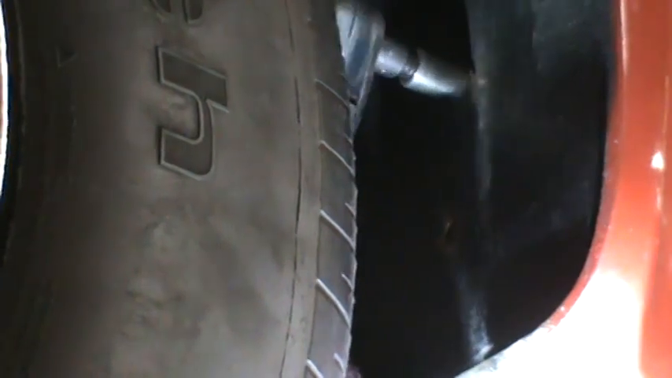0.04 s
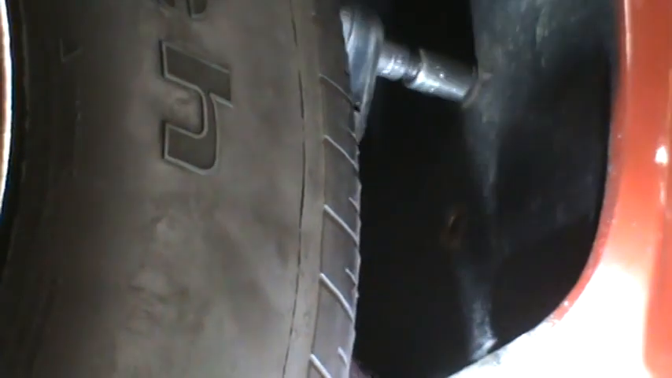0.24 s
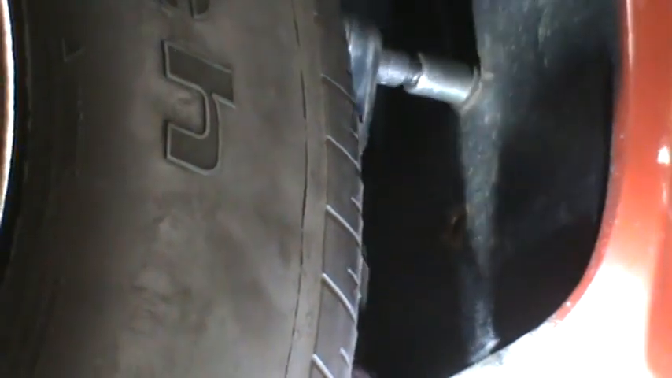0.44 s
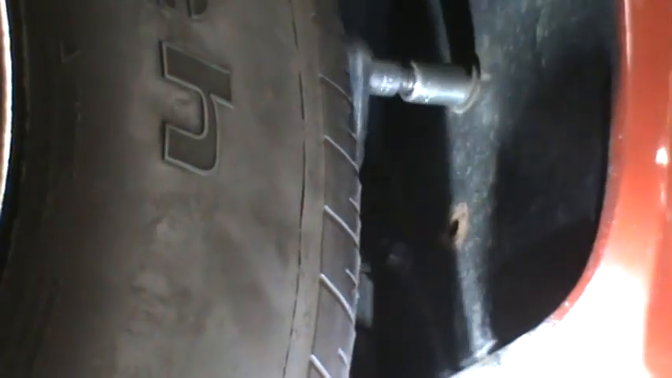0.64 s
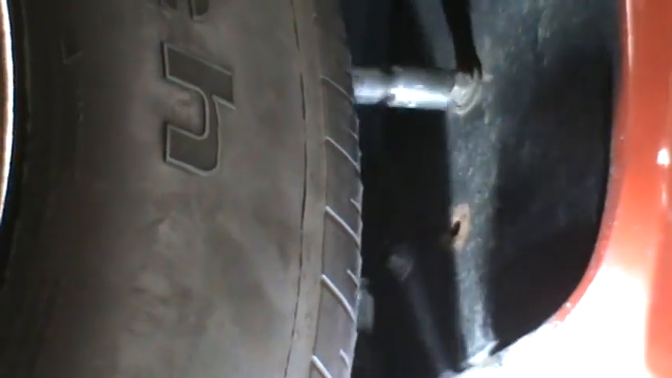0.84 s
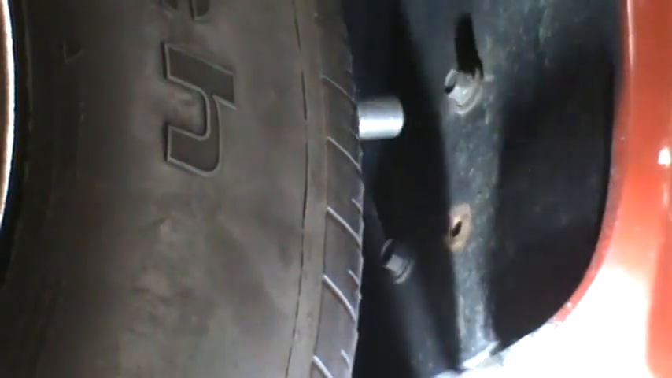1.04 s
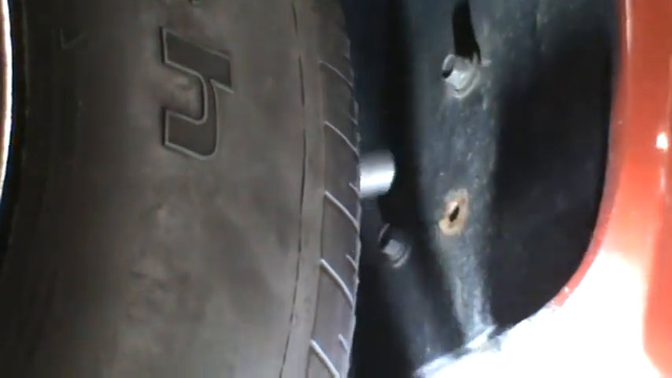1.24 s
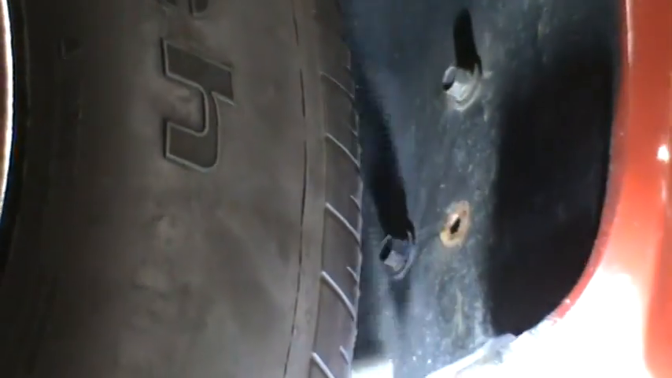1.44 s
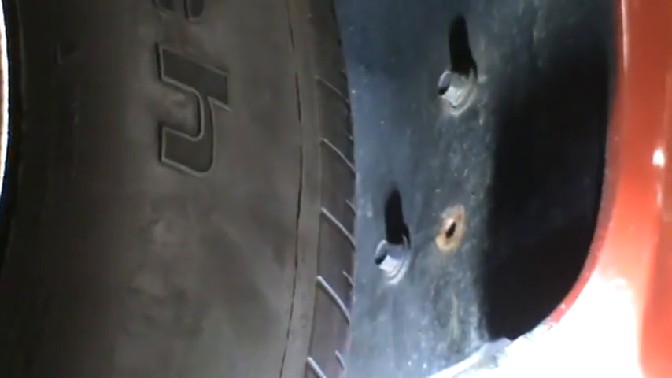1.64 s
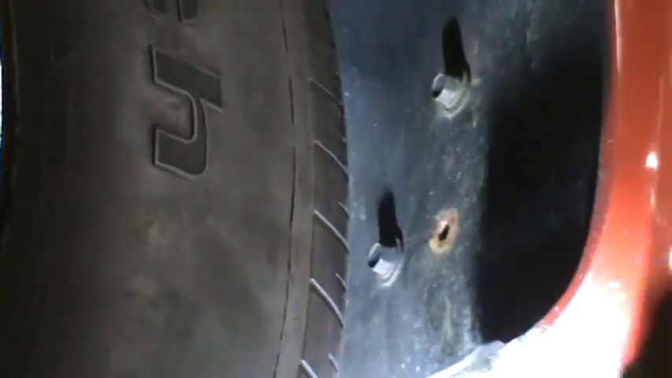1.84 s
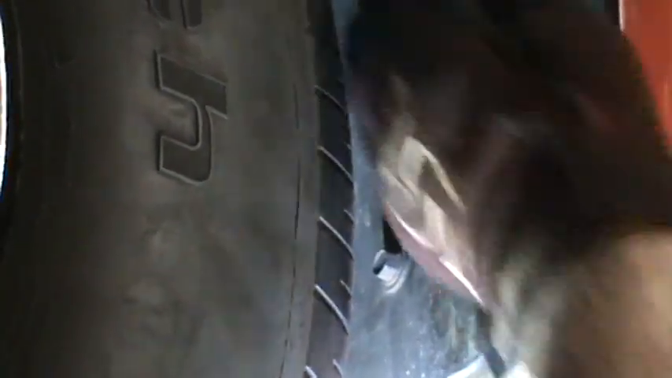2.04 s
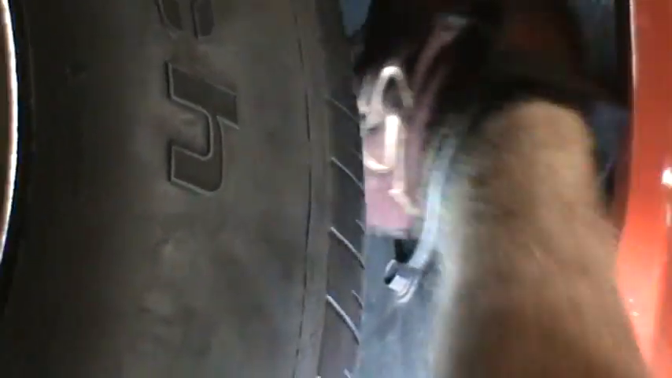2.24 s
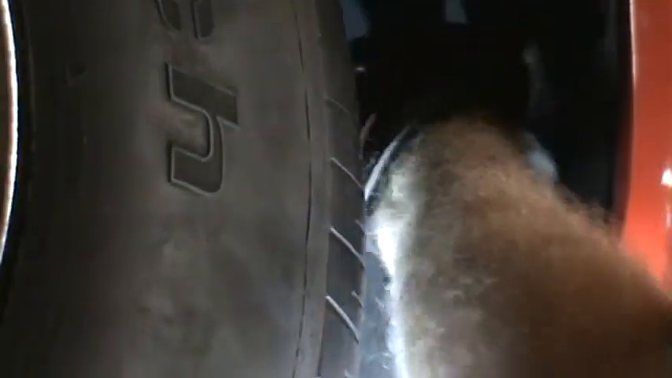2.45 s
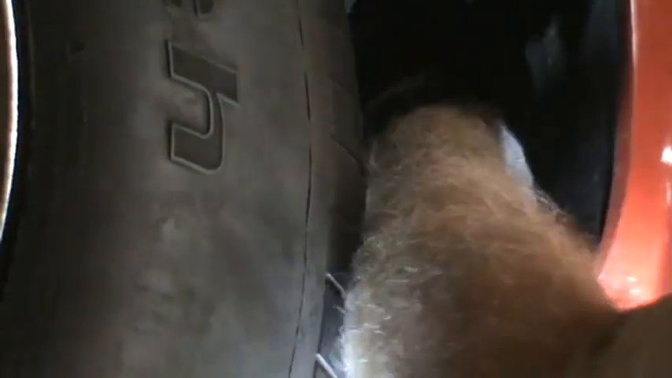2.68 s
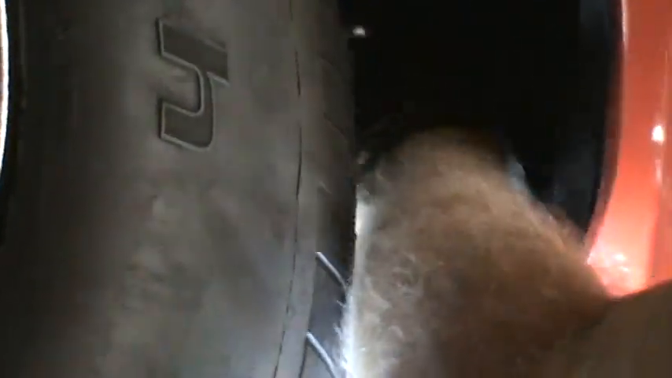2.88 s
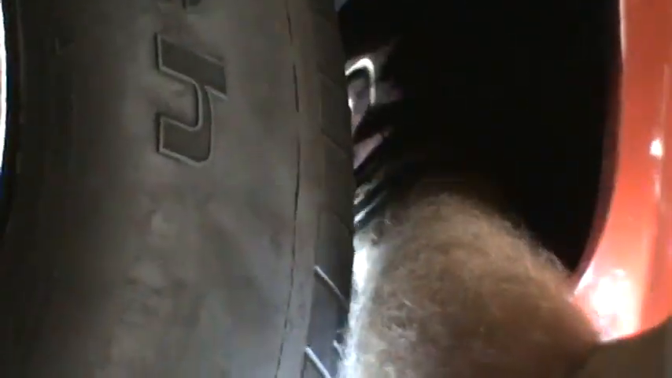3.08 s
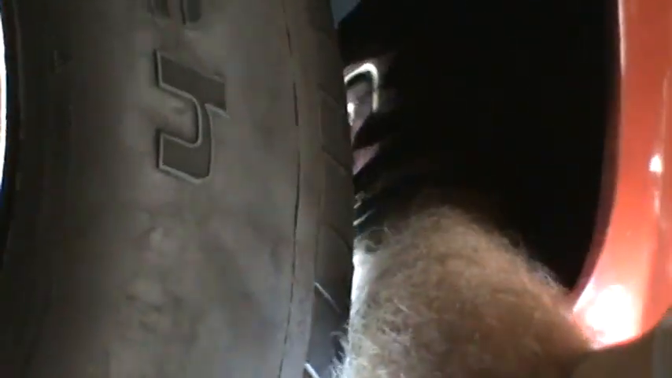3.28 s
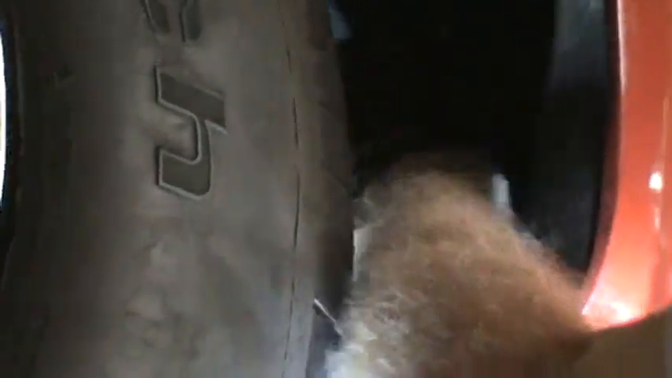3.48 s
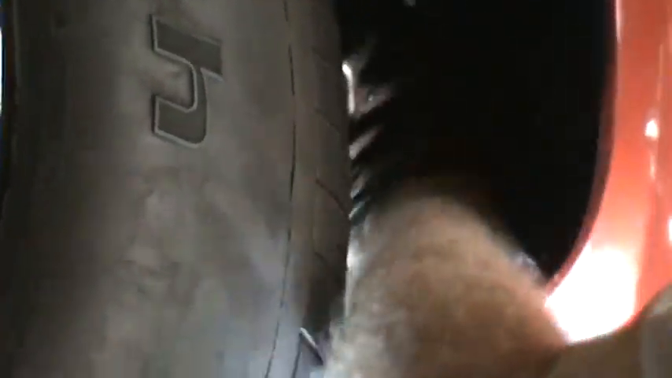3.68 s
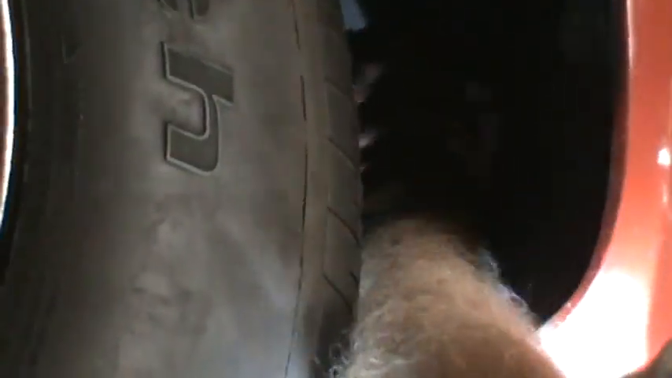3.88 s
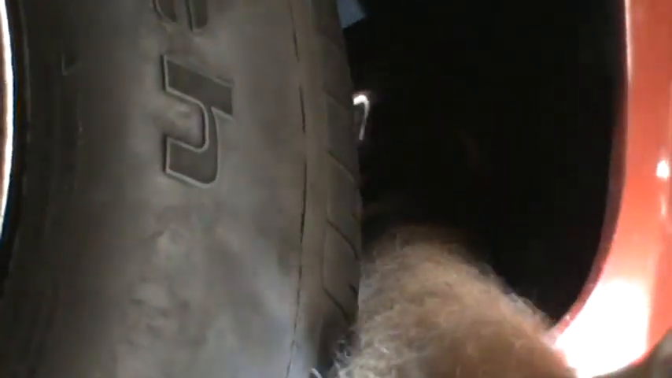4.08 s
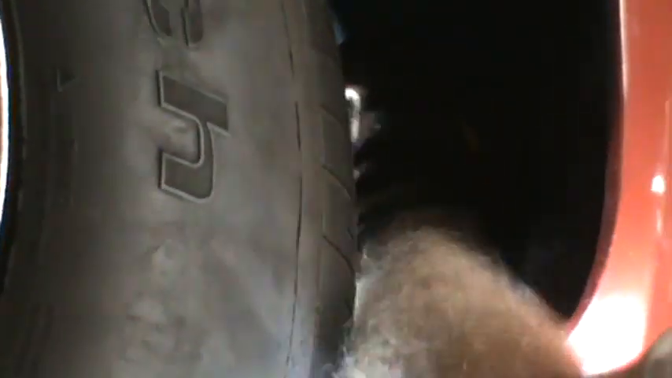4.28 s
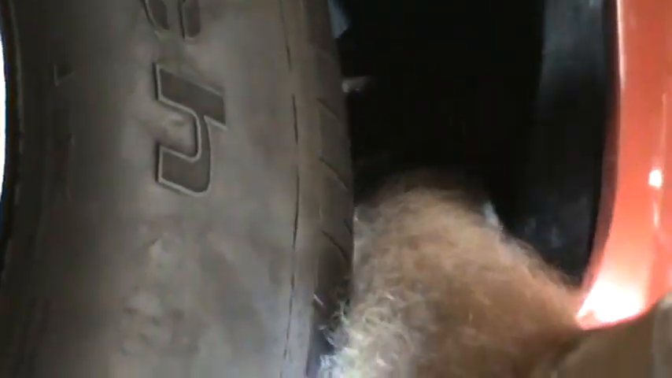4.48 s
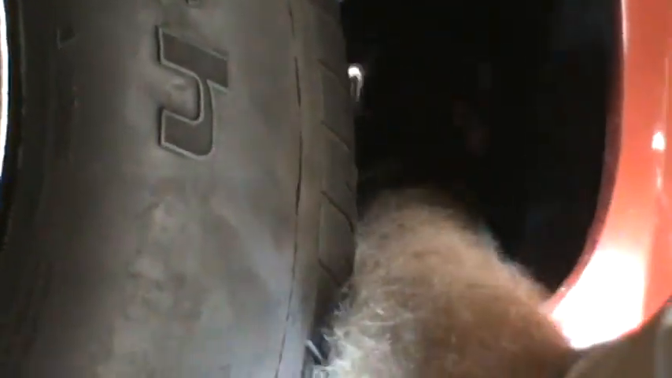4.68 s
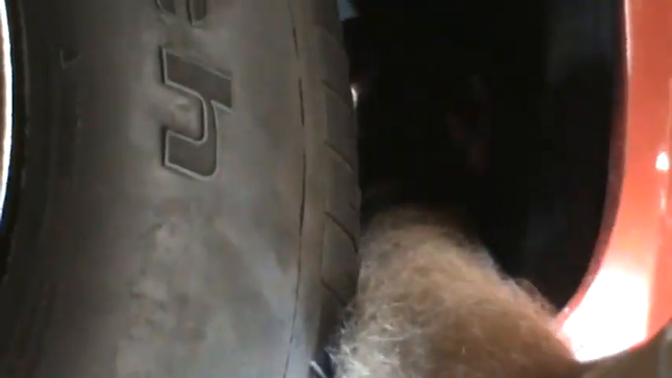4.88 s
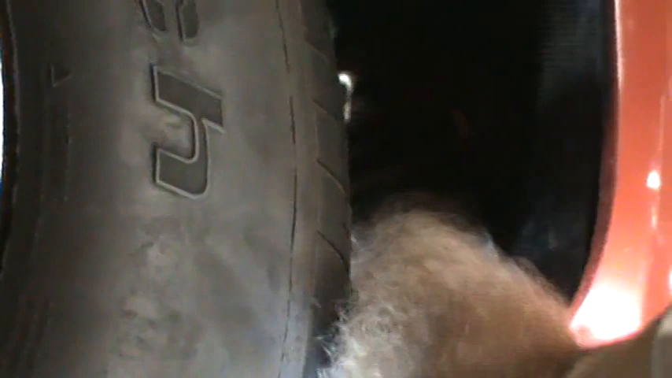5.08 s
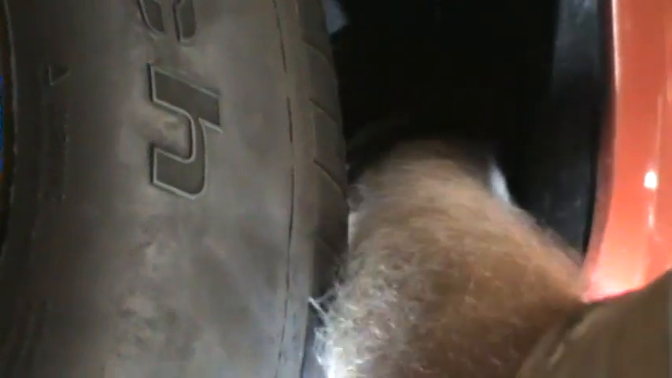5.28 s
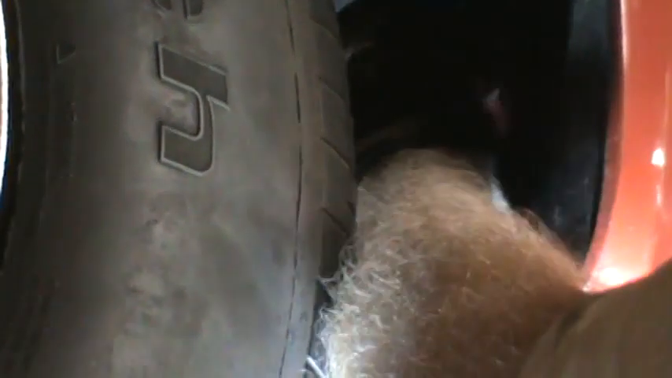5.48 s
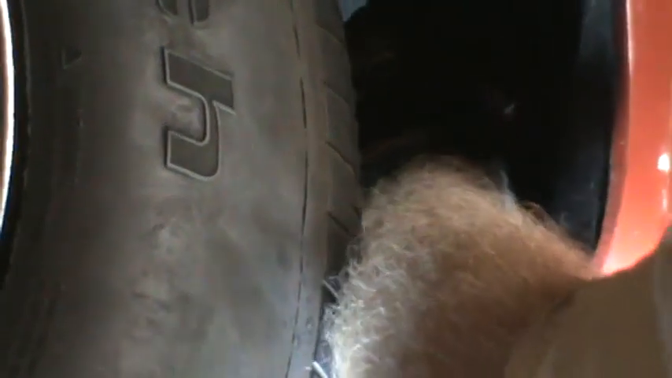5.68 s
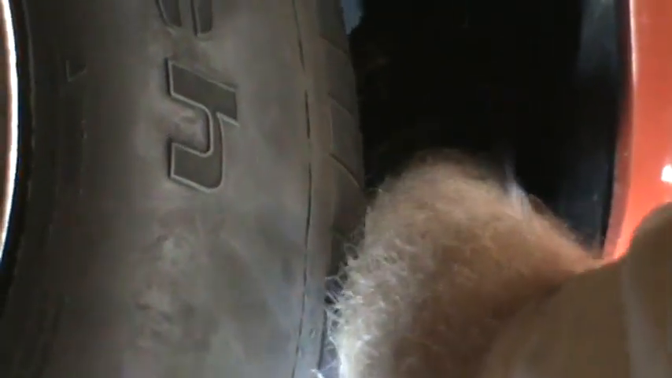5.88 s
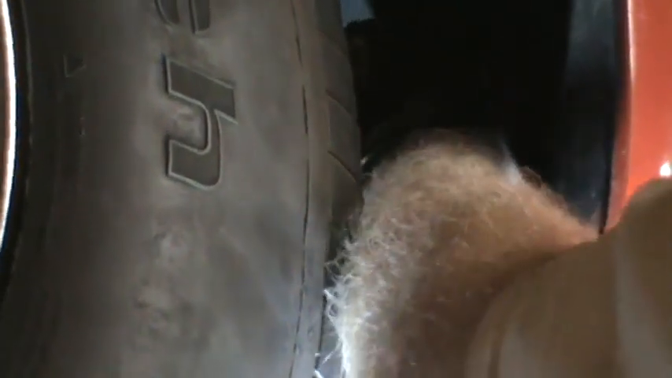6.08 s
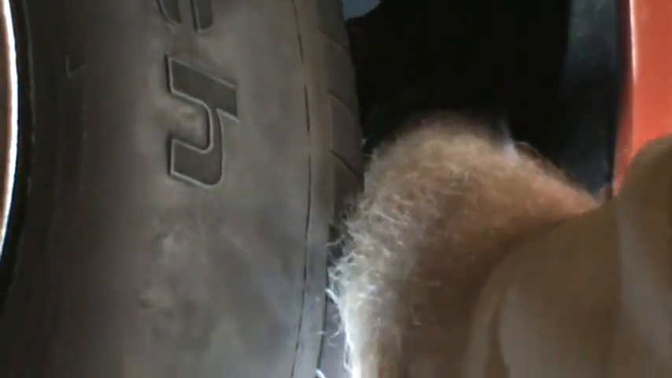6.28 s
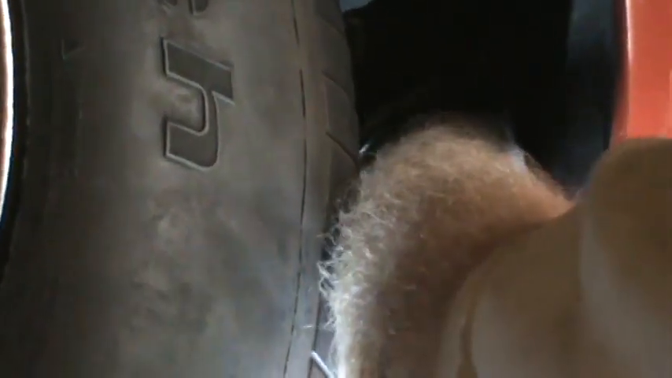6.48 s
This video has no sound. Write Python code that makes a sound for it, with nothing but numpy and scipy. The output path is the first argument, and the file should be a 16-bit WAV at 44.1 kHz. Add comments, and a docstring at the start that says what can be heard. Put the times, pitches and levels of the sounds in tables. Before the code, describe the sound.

From the start an air ratchet runs close by: a slightly wavering whine near 2 kHz, rising briefly as it gets going, buried in a bright, dense hiss of exhaust air. At about 1.05 s the trigger is let go; the pitch plunges in a very short chirp with a couple of puffs, and the garage rings for a moment. Near-quiet with faint hum follows. From 1.75 to 2.5 s a cluster of light, hollow panel knocks begins, then soft cloth brushing. A sharp near clack lands at 3.5 s, a firm knock at 3.63 s. Between 3.9 and 5.1 s irregular thumps and taps mix with grainy sleeve strokes. Two loud, reverberant metal bangs strike at 5.2 and 5.6 s, slightly left, with a tiny high steel clink at 5.73 s. A longer rub at 5.9 s and faint knocks at 6.2 and 6.3 s lead to the end at 6.5 s.

```python
"""An air ratchet whines and hisses, chirps down as its trigger is let go and rings out in a garage.
A hand then works in a wheel arch: knocks on the panel, cloth rubbing, a clack, two loud bangs and a steel clink.
The ratchet is sine orders of one motor plus exhaust noise; blows are noise bursts that ring resonances.
The clink is two dying sines, the cloth grainy noise; a quiet room and faint hum lie beneath it all.
A microphone pair with a fast gain control stands close by."""
import sys
import numpy as np
from scipy import signal
from scipy.fft import rfft, irfft, next_fast_len
from scipy.io import wavfile
from scipy.ndimage import uniform_filter1d, minimum_filter1d, map_coordinates

SR = 44100
rng = np.random.default_rng(int(sys.argv[2]) if len(sys.argv) > 2 else 0)


def natural_amplitude(level_db):
    """Convert a level in decibels to a linear amplitude factor, elementwise."""
    exponent = np.asarray(level_db, float) / 20
    return 10 ** exponent


def file_out(sig):
    """Save sig as 16-bit WAV at sys.argv[1]."""
    # one column per channel
    cols = np.atleast_2d(sig).T
    # limit, then scale
    lim = np.clip(cols, -1, 1)
    pcm = np.round(lim * 32767).astype(np.int16)
    wavfile.write(sys.argv[1], SR, pcm)


N = 287973  # length [samples]


def unit(x):
    """Scale to rms 1."""
    return x / np.sqrt(np.mean(x ** 2) + 1e-20)


def along(points, hz):
    """Read (frequency [Hz], value) points on a log frequency axis."""
    f, v = np.transpose(points)
    return np.interp(np.log(hz + 1), np.log(f + 1), v)


def curves(rows):
    """One value per sample for each column after the time."""
    s, *cols = np.transpose(rows)
    return [np.interp(np.arange(N) / SR, s, c) for c in cols]


def wobble(rate):
    """A smooth random curve, rate knots a second."""
    knots = rng.standard_normal(int(N * rate / SR) + 4)
    return map_coordinates(knots, [np.arange(N) * rate / SR])


def filtered(x, response):
    """x shaped by a real or complex response of frequency."""
    n = x.shape[-1]
    m = next_fast_len(n + 8192)
    return irfft(rfft(x, m) * response(np.fft.rfftfreq(m, 1 / SR)), m)[..., :n]


def shaped(x, points):
    """x coloured by (frequency [Hz], level [dB]) points."""
    return filtered(x, lambda f: natural_amplitude(along(points, f)))


def modes(table, f):
    """Causal response of (frequency [Hz], width [Hz], level [dB]) resonances, with alternating signs."""
    total = 0
    for k, (centre, width, db) in enumerate(table):
        damping = 1j * f * width
        total = total + (-1) ** k * natural_amplitude(db) * damping / (centre * centre - f * f + damping)
    return total


def pair(n):
    """Stereo noise, as alike left and right as sound in this garage."""
    # left-right likeness of sound in the garage: (frequency [Hz], correlation)
    alike = [(40, 0.54), (100, 0.7), (230, 0.94), (870, 0.85), (3300, 0.69), (9000, .75), (12500, 0.24)]

    def mid_side(hz):
        turn = np.arccos(np.clip(along(alike, hz), -1, 1)) / 2
        return np.array([np.cos(turn), np.sin(turn)])

    mid, side = filtered(rng.standard_normal((2, n)), mid_side)
    return np.array([mid + side, mid - side])


def tail():
    """A fresh one-second garage tail, starting at rms 1: each frequency dies at its own speed."""
    # reverberation of the garage: (frequency [Hz], time to fall 60 dB [s])
    garage = [(100, 1.44), (300, 0.83), (1000, 0.68), (3000, 0.62), (6000, 0.55), (12000, 0.32)]
    hz, t, z = signal.stft(pair(SR), SR, nperseg=256)
    decay = natural_amplitude(-60 * t / along(garage, hz)[:, None])
    return signal.istft(z * decay, SR, nperseg=256)[1][:, :SR]


def add(out, s, pan_db, x):
    """Mix a stereo event in at time s, the left louder than the right by pan_db."""
    part = out[:, round(s * SR):][:, :x.shape[1]]
    part += x[:, :part.shape[1]] * natural_amplitude([[pan_db / 2], [-pan_db / 2]])


def motor_whine(t):
    """Vane motor: a gliding whine of wavering level; further orders grow in as the rotor reaches speed."""
    # whine as heard in the garage, its level wavering with the echoes:
    # (time [s], pitch [Hz], level [dB])
    whine = [(0, 1715, -22.5), (.025, 1978, -19), (.06, 2060, -19.5), (.15, 2001, -23), (.33, 1964, -13),
             (.42, 1950, -14), (.6, 1960, -10.5), (.75, 1990, -16.5), (.84, 2008, -20), (.97, 1981, -12),
             (1.02, 1974, -18), (1.04, 1983, -27)]
    # further motor orders: (multiple of the whine, level [dB])
    orders = [(.5, -42), (1.5, -33.5), (2, -37.5), (2.5, -28), (3, -35), (4, -31), (4.5, -33.5), (5, -29),
              (5.5, -32)]
    spin_up_s, flutter_db = 0.04, 4.5
    hz, whine_db = curves(whine)
    phase = 2 * np.pi * np.cumsum(hz) / SR
    further = 0
    for k, db in orders:
        level = natural_amplitude(db + flutter_db * wobble(25))
        further = further + level * np.sin(k * (phase + 0.63 * wobble(40.01)))
    return natural_amplitude(whine_db) * np.sin(phase) + (1 - np.exp(-t / spin_up_s)) * further


def exhaust_air():
    """Air leaving the exhaust: coloured noise whose level wavers quickly and slowly."""
    # colour of the exhaust hiss: (frequency [Hz], relative level per Hz [dB])
    exhaust = [(65, -71.5), (110, -36), (233, -19), (367, -20), (601, -12), (663, -15), (1710, -12.5),
               (1920, -8), (2080, -10), (2300, -12.5), (9710, -9.5), (11400, -11.5), (12300, -16.5),
               (16000, -51), (22000, -120)]
    level = natural_amplitude(-18.5 + 0.56 * wobble(40) + 0.25 * wobble(2.9))
    return level * unit(shaped(pair(N), exhaust))


def rundown(t, since):
    """The slowing rotor: a falling sine that swells and fades, and the last gasps of the vanes."""
    # last gasps of the vanes: (time [s], level [dB])
    puffs = [(1.082, -12.5), (1.104, -15.5)]
    start_hz, sag_hz_per_s, level_db = 1000, 13500, -16
    rise_s, fade_s = 0.0083, 0.041
    down_hz = np.clip(start_hz - sag_hz_per_s * since, 0, None)
    swell = np.clip(since / rise_s, 0, 1) ** 2 * np.exp(-(since / fade_s) ** 3)
    chirp = swell * natural_amplitude(level_db + 2.6 * wobble(180)) * np.sin(2 * np.pi * np.cumsum(down_hz) / SR)
    # each puff is a few cycles of the exhaust port's own pitch
    for s, db in puffs:
        chirp += natural_amplitude(db) * np.exp(-((t - s) / 0.0025) ** 2) * np.sin(2 * np.pi * 720 * (t - s))
    return chirp


def ratchet():
    """Whine and exhaust until the valve shuts, then the rundown; both excite the garage."""
    release_s, close_s = 1.047, 0.0067  # the trigger is let go; the valve takes this long to shut
    t = np.arange(N) / SR
    since = np.clip(t - release_s, 0, None)
    valve = np.clip(1 - since / close_s, 0, 1)
    running = valve * (motor_whine(t) + exhaust_air())
    chirp = rundown(t, since)
    room = np.pad(tail(), ((0, 0), (500, 0))) / np.sqrt(SR)  # the tail comes 500 samples late

    def echo(x):
        return signal.fftconvolve(x, room, axes=1)[:, :N]

    return running + chirp + natural_amplitude(9.5) * echo(running) + natural_amplitude(11) * echo(chirp[None])


def bangs():
    """A sharp near clack and two heavy blows: noise bursts that also ring a large metal body."""
    # blows: (time [s], level [dB], room [dB], body ring [dB], left minus right [dB])
    blows = [(3.499, -3, -9.5, -9.5, 0), (5.185, 2.5, 9.5, -6.5, 2.5), (5.603, 3, 8.5, -2.5, 2.5)]
    # colour, one list for each blow: (frequency [Hz], level per Hz [dB])
    colours = [
        [(35, -66), (60, -45), (208, -17.5), (386, -13), (602, -3), (877, -13.5), (1670, -1), (2380, -8),
         (3040, -10), (5520, -18.5), (8610, -10.5), (12000, -23), (15600, -58), (22000, -120)],
        [(24, -69), (40, -37), (160, -14), (490, -6.5), (579, -2), (809, -11), (1050, -9.5), (2150, -12),
         (3080, -9), (12000, -40), (15600, -77.5), (22000, -120)],
        [(24, -58.5), (40, -28), (386, -6), (435, -3), (809, -10), (2050, -9.5), (3300, -14), (5860, -29.5),
         (9450, -49), (12000, -120), (15600, -150), (22000, -120)],
    ]
    # resonances of the metal body: (frequency [Hz], width [Hz], level [dB])
    metal = [(234, 26, -5), (347, 18, 4.5), (458, 5.8, 1), (577, 19, 2.5), (785, 34, -2.5), (1182, 10, 3.5),
             (1760, 37, -24), (3096, 26, -18), (4430, 91, -38)]
    out, t = np.zeros((2, N)), np.arange(SR) / SR
    for (s, db, room_db, ring_db, pan_db), colour in zip(blows, colours):
        burst = pair(SR) * natural_amplitude(-60 * t / 0.156)
        blow = (burst + natural_amplitude(room_db) * tail()) * (1 - np.exp(-t / 0.003))

        def struck(f):
            body = natural_amplitude(ring_db) * modes(metal, f) / (1 + 1j * f / 4000) ** 2
            return natural_amplitude(along(colour, f)) + body

        add(out, s, pan_db, natural_amplitude(db) * filtered(blow, struck))
    return out


def clink():
    """A small steel part: dying sines, their garage tail and a tick of treble noise."""
    # ringing of the steel: (frequency [Hz], level [dB], time to fall 60 dB [s])
    steel = [(6940, -17, 0.052), (8670, -35.5, 0.14)]
    out, t = np.zeros((2, N)), np.arange(SR) / SR
    ring = sum(natural_amplitude(db - 60 * t / t60) * np.sin(2 * np.pi * hz * t) for hz, db, t60 in steel)
    room = signal.fftconvolve(ring[None], tail(), axes=1)[:, :SR] / np.sqrt(SR)
    tick = filtered(pair(SR) * natural_amplitude(-60 * t / 0.042) + 0.68 * tail(), lambda f: f > 6000)
    add(out, 5.731, 0, ring + natural_amplitude(8.5) * room + natural_amplitude(-34.5) * tick)
    return out


def knocks():
    """Each knock is a short burst plus its garage tail; both and a sharp click also ring the panel."""
    # knocks: (time [s], overall level [dB], panel ring [dB], snap at 6 kHz [dB], room [dB])
    hits = [(1.764, -32, -12, -31, -4), (1.819, -31, -3, -28, 0), (1.877, -16.5, 6, -36, -3),
            (1.969, -20, 0, -20.5, -9), (1.989, -19, 4.5, -19.5, -2), (2.034, -27, -5, -23, -9),
            (2.19, -22, 2.5, -29, -5.5), (2.398, -25.5, -4, -19, -3.5), (2.47, -29.5, 5, -19, -5.5),
            (2.544, -31.5, 16, -41, -10), (2.793, -36.5, 14.5, -41, -3.5), (2.914, -36, 10, -4.5, -8.5),
            (3.196, -56, 21, -25, -9.5), (3.361, -41, 22, -15, -5), (3.429, -50, 26.5, -3, -1),
            (3.621, -23, 14, -28, -17), (3.631, -9, 5.5, -23, -11), (3.944, -38.5, 14.5, -9.5, -4.5),
            (4.113, -34, 5, -19, -14.5), (4.207, -35.5, 15, -12, -1), (4.236, -30.5, 15.5, -13, -4),
            (4.292, -21, -3, -48, -12), (4.379, -29.5, 21.5, -25, -6), (4.394, -39, 25, -30, -8),
            (4.519, -28, 2, -9.5, -10), (4.634, -27.5, 20.5, -33, -12), (4.649, -33.5, 19.5, -30, -2.5),
            (4.686, -38, 31, -36, -7), (4.728, -18, 6.5, -21.5, -9), (4.794, -36.5, 22, -9.5, -1),
            (4.828, -23.5, 15.5, -24, -11), (5.01, -30, 19, -11.5, -2), (5.135, -30, 3, -31, -0.5),
            (6.19, -31.5, 11, -25, -2), (6.289, -36, 3, -25, -4.5)]
    # resonances of the panel: (frequency [Hz], width [Hz], level [dB])
    panel = [(248, 26, -8.5), (477, 32, -10), (587, 26, 1), (900, 73, -10.5), (1432, 46, -15.5),
             (1790, 200, -21.5)]
    # bass of a knock, raised by the panel ring: (frequency [Hz], level [dB])
    thud = [(50, -43), (130, -23), (300, -13)]
    # middle of a knock: (frequency [Hz], level [dB])
    mids = [(800, -2), (1600, -5.5), (3000, -9)]
    burst_t60_s, snap_fall_db = 0.14, 10  # the snap falls this much from 6 to 12 kHz
    out, t = np.zeros((2, N)), np.arange(SR) / SR
    click = 3 * np.exp(-t / 0.00012)
    for s, db, ring_db, snap_db, room_db in hits:
        burst = pair(SR) * natural_amplitude(-60 * t / burst_t60_s) * (1 - np.exp(-t / 0.0011))
        room = natural_amplitude(room_db) * tail() * (1 - np.exp(-t / 0.0089))
        bass = [(hz, level + ring_db) for hz, level in thud]
        snap = [(6000, snap_db), (12000, snap_db - snap_fall_db)]
        direct = shaped(burst + room, bass + list(mids) + snap)
        ring = filtered(burst + 0.55 * room + click, lambda f: modes(panel, f) / (1 + 1j * f / 2500) ** 2)
        add(out, s, 0, natural_amplitude(db) * (direct + natural_amplitude(ring_db) * ring))
    return out


def rubbing():
    """Sleeve and glove brush along tyre and panel in short grainy strokes that linger a little."""
    # strokes: (time [s], level [dB], time to fall 17 dB [s])
    brushes = [(1.855, -65, 0.057), (2.292, -56.5, .051), (2.655, -48.5, 0.078), (2.78, -57, .056),
               (3.455, -53, 0.16), (3.934, -55.5, .058), (4.042, -58, 0.027), (4.242, -44, .052),
               (4.362, -50, 0.13), (4.506, -52.5, 0.1), (4.648, -48, 0.053), (4.816, -45.5, 0.099),
               (5.006, -48.5, 0.12), (5.137, -52.5, 0.14), (5.444, -45, .019), (5.881, -38, 0.26),
               (6.163, -50, .053), (6.268, -56, 0.12), (6.467, -70, 0.12)]
    # how busy the arm is, heard as a faint rustle: (time [s], level [dB])
    stir = [(1.6, -83.5), (1.8, -61.5), (2.5, -59), (3.2, -70), (3.8, -61), (5.1, -52), (6.53, -59.5)]
    # colour of the cloth: (frequency [Hz], relative level per Hz [dB])
    fabric = [(100, -27), (400, 2.5), (1500, -2.5), (4000, -13), (8000, -17), (12000, -23)]
    t = np.arange(N) / SR
    strokes = natural_amplitude(curves(stir)[0])
    for s, db, length in brushes:
        side_s = length * np.where(t < s, 0.4, 1)  # quicker in than out
        strokes = strokes + natural_amplitude(db) * np.exp(-2 * ((t - s) / side_s) ** 2)
    cloth = unit(shaped(pair(N), fabric))
    # threads catch and let go, about 60 times a second
    catches = rng.random(N) < 60 / SR
    snags = 1 + 0.89 * signal.fftconvolve(catches, np.exp(-t[:SR // 50] / 0.0016))[:N]
    return natural_amplitude(2.3 * wobble(27)) * snags * strokes * cloth


def hush():
    """The quiet garage: coloured noise, swelling a little, with faint hum of unsteady level and phase."""
    # hum: (frequency [Hz], level [dB])
    tones = [(60, -79.5), (119, -69.5)]
    # colour of the quiet: (frequency [Hz], relative level per Hz [dB])
    quiet = [(25, -28), (60, -9), (110, -2.5), (250, -5.5), (600, -11), (1200, -17.5), (2500, -15),
             (6000, -25), (12000, -27.5)]
    t = np.arange(N) / SR
    hum = sum(natural_amplitude(db + 2.9 * wobble(7.2)) * np.sin(2 * np.pi * hz * t + wobble(28)) for hz, db in tones)
    return hum + natural_amplitude(-61 + 1.8 * wobble(7.8)) * unit(shaped(pair(N), quiet))


def scene():
    """All sources at the microphone pair."""
    return ratchet() + bangs() + clink() + knocks() + rubbing() + hush()


def low_pass(x):
    """Removes everything above the highest recorded frequency."""
    return signal.sosfilt(signal.butter(12, 13210, fs=SR, output="sos"), x)


def record(dry):
    """Overall tone and left-right balance; gain control squeezes loud passages, peaks clip softly."""
    # overall tone, with a steep low-pass near 12.3 kHz: (frequency [Hz], level [dB])
    tone = [(20, -8), (60, 2), (150, 2), (4800, 0), (5500, 0), (6300, 1), (11800, 2), (12300, -9),
            (12500, -53.5)]
    # the left port hears more bass: (frequency [Hz], left minus right [dB])
    left_lead = [(60, 6.5), (150, 2.5), (400, 2), (1200, 2), (4000, 1.5), (12000, 1)]
    sides = np.array([[0.5], [-0.5]])
    x = filtered(dry, lambda f: natural_amplitude(along(tone, f) + along(left_lead, f) * sides))
    loud = np.sqrt(np.abs(uniform_filter1d(np.mean(x ** 2, 0), size=600)))
    # about two thirds of the decibels above -16 dB are taken away
    need = np.minimum(1, natural_amplitude(-16.0) / (loud + 1e-9)) ** 0.67
    gain = uniform_filter1d(minimum_filter1d(need, size=500), size=500)
    levelled = x * gain
    mix = levelled / (1 + np.abs(levelled / 0.95) ** 6) ** (1 / 6)  # soft clip towards 0.95
    return low_pass(mix)


dry = scene()
out = record(dry)
file_out(out)
```